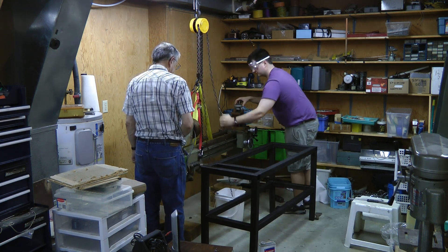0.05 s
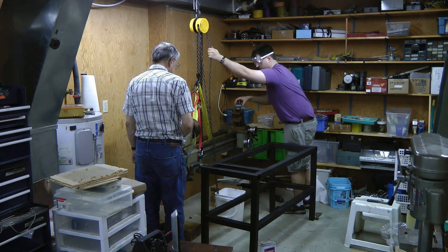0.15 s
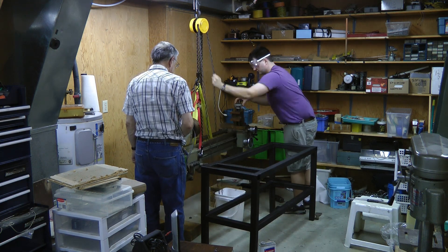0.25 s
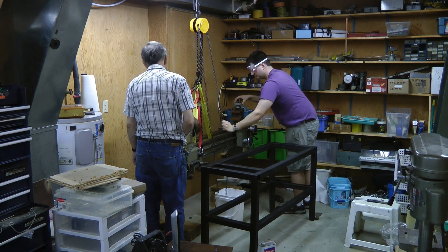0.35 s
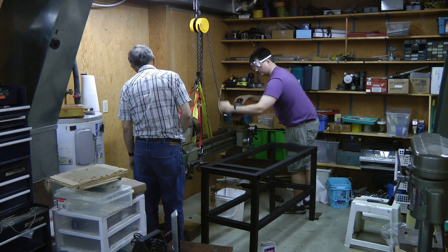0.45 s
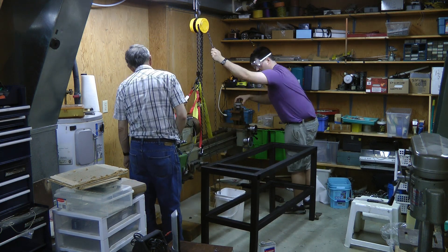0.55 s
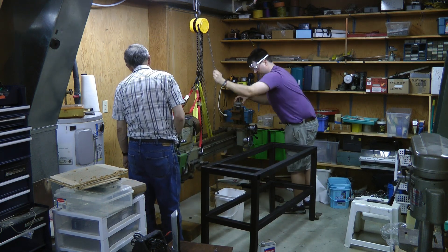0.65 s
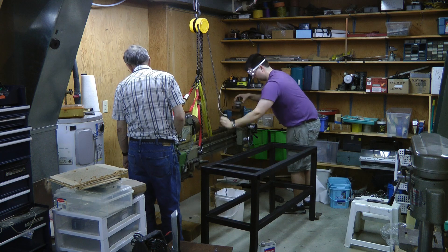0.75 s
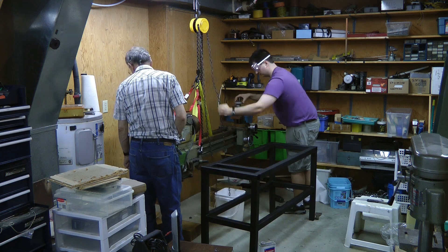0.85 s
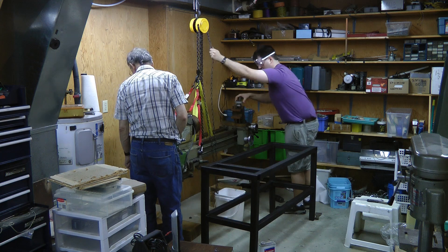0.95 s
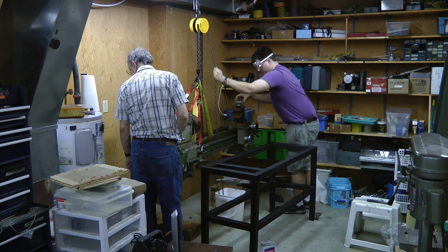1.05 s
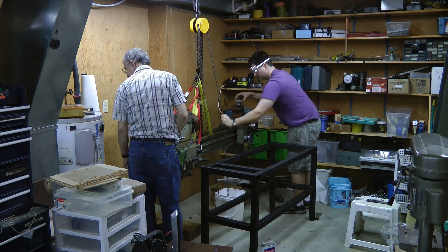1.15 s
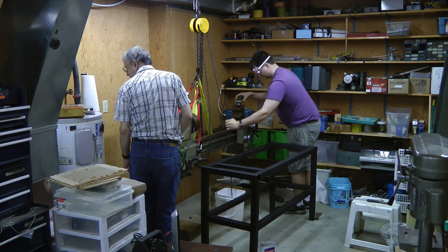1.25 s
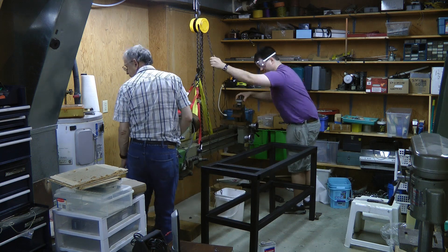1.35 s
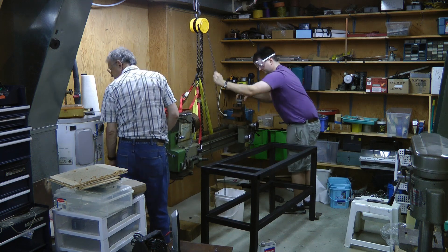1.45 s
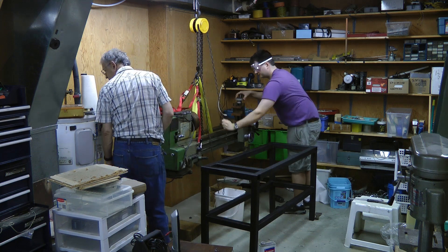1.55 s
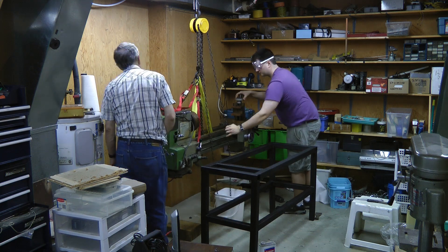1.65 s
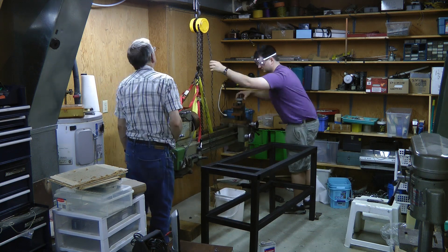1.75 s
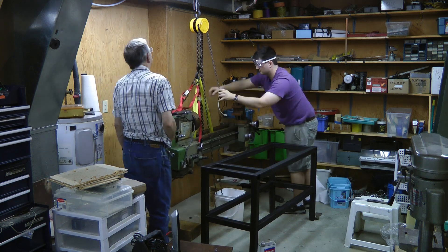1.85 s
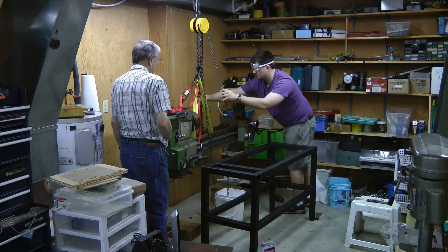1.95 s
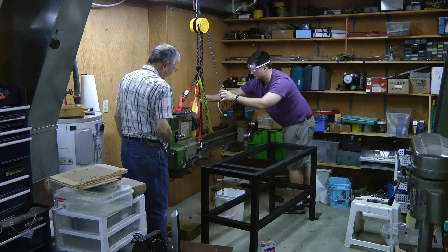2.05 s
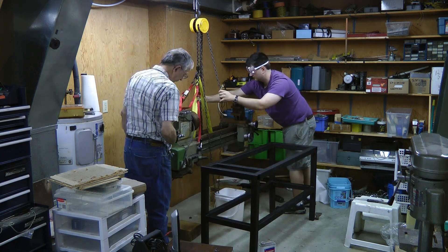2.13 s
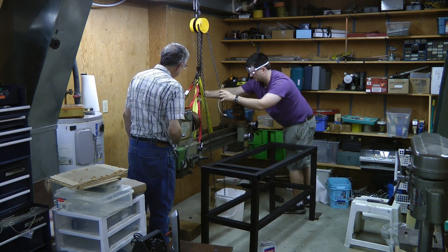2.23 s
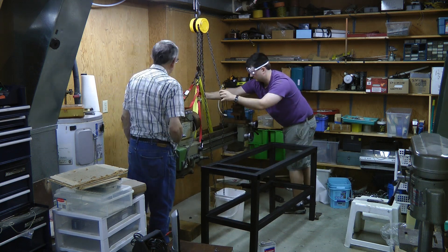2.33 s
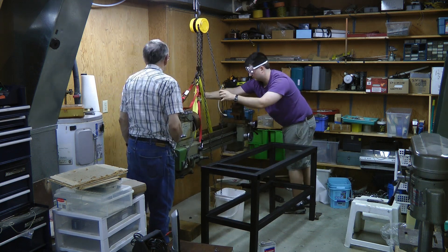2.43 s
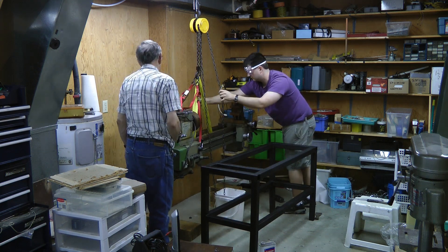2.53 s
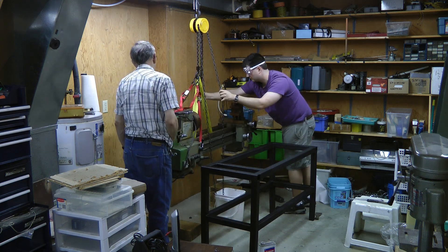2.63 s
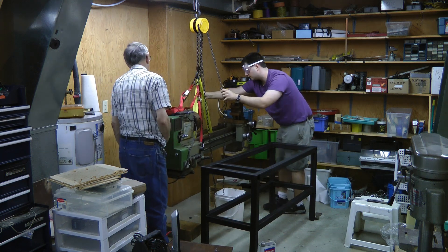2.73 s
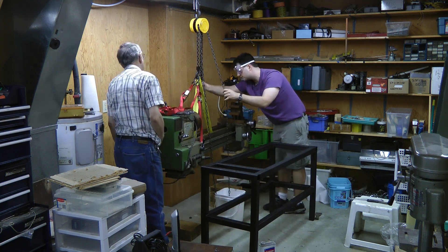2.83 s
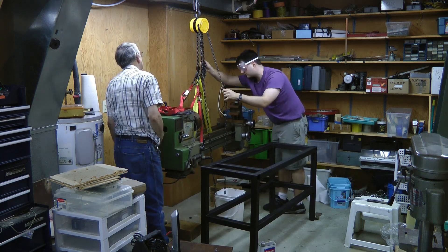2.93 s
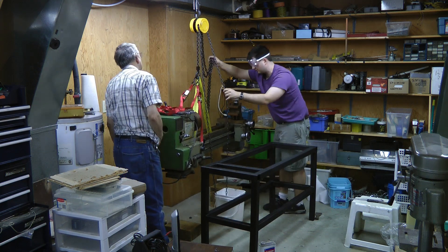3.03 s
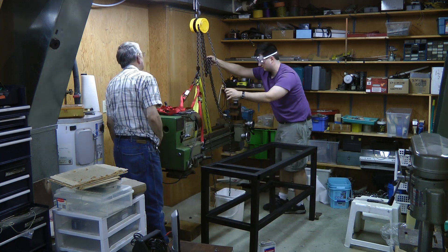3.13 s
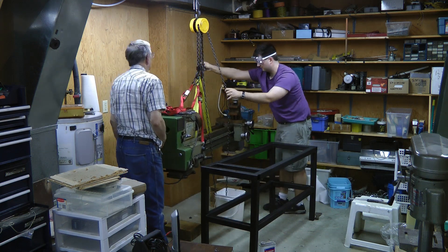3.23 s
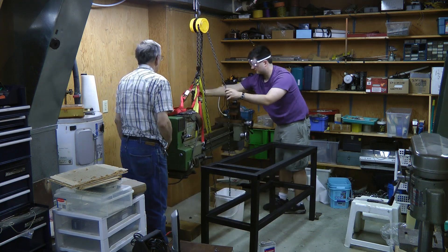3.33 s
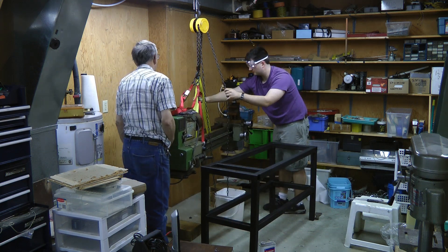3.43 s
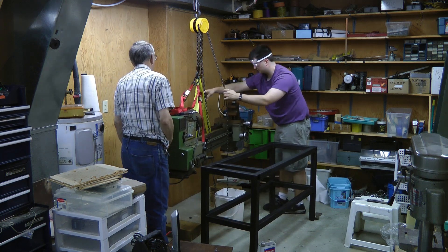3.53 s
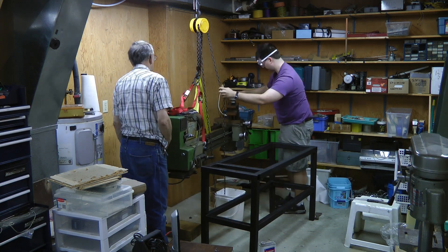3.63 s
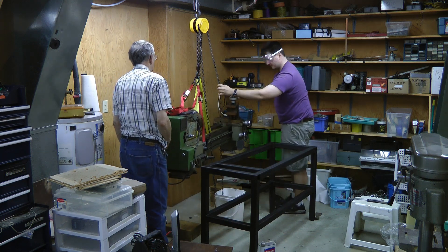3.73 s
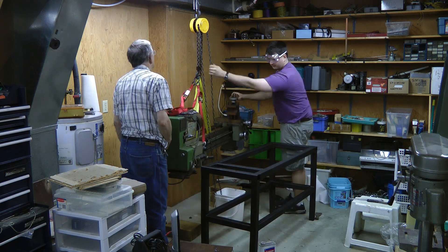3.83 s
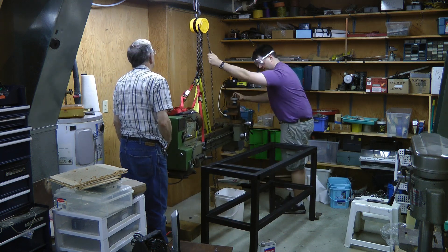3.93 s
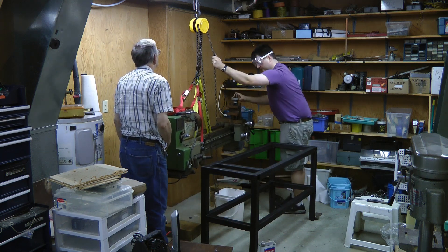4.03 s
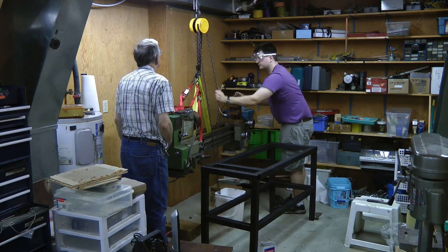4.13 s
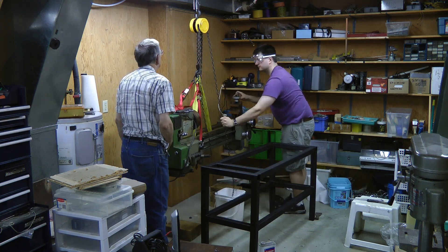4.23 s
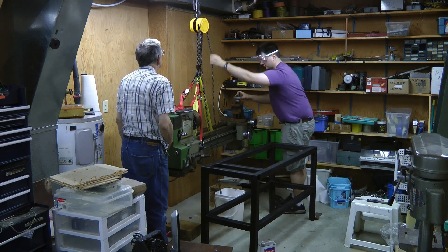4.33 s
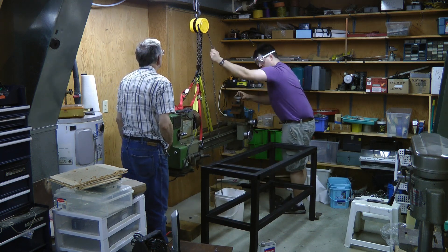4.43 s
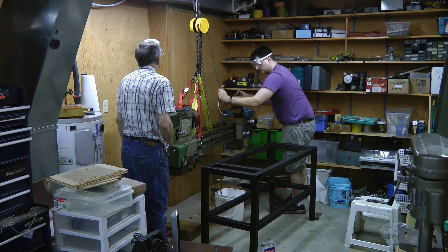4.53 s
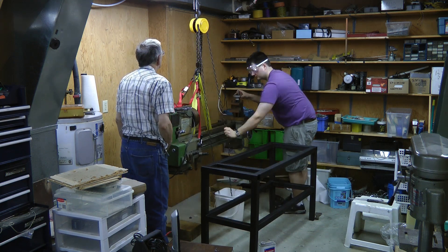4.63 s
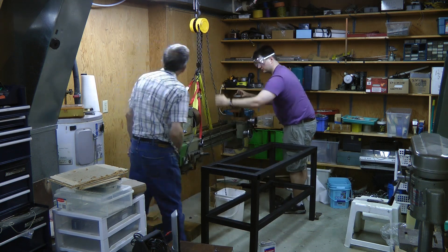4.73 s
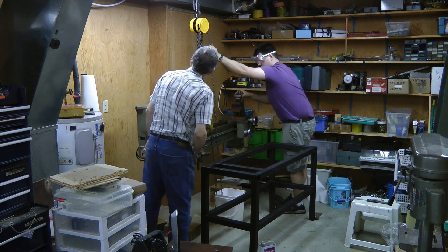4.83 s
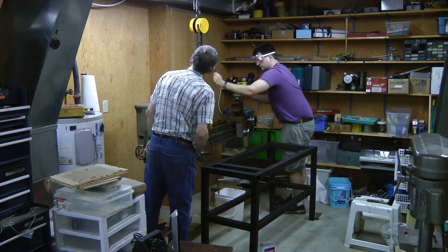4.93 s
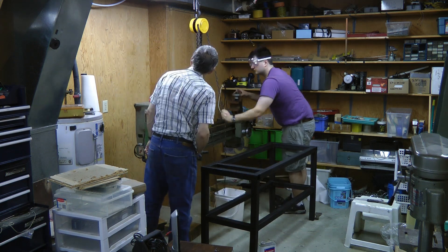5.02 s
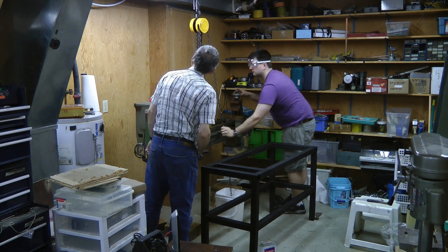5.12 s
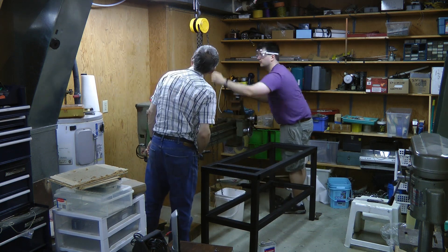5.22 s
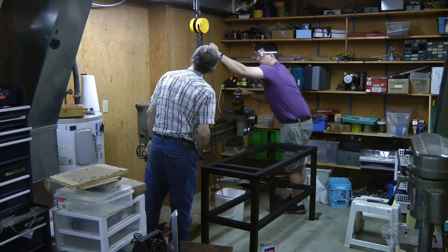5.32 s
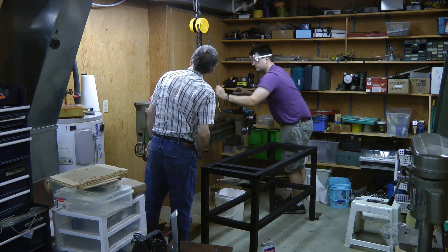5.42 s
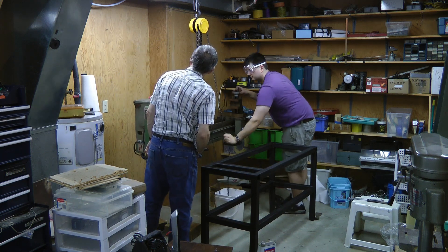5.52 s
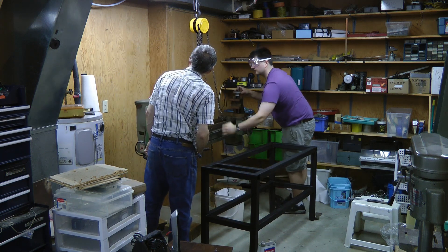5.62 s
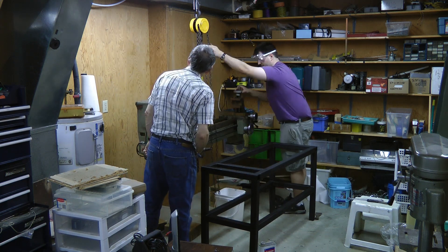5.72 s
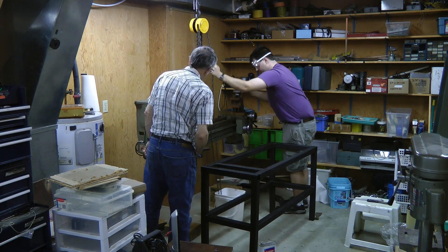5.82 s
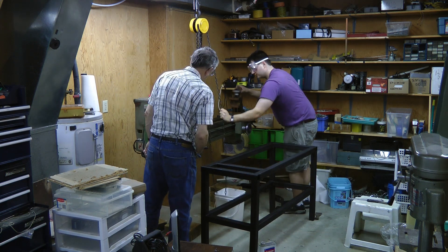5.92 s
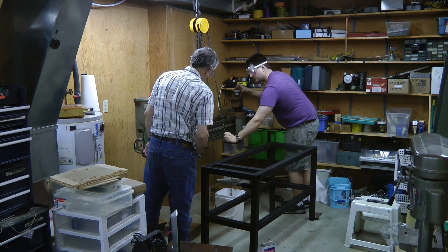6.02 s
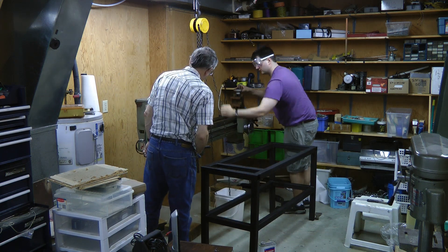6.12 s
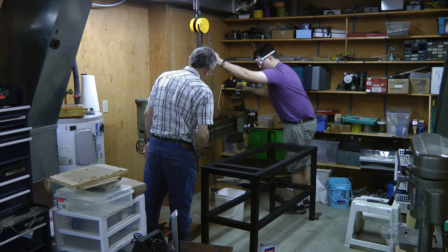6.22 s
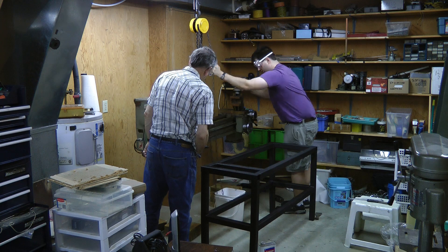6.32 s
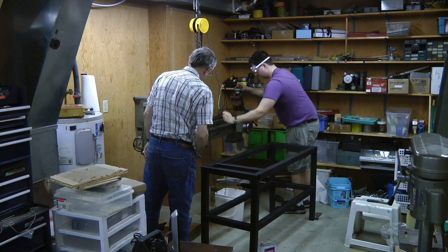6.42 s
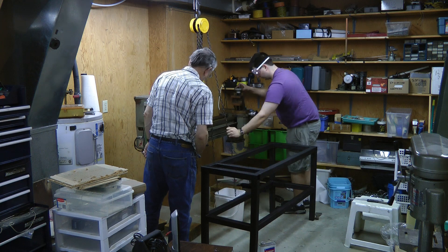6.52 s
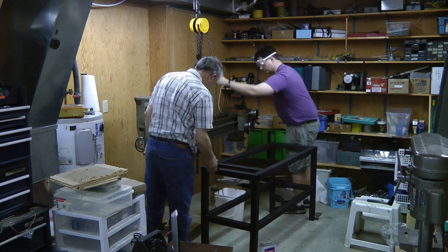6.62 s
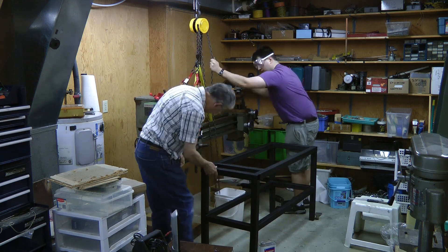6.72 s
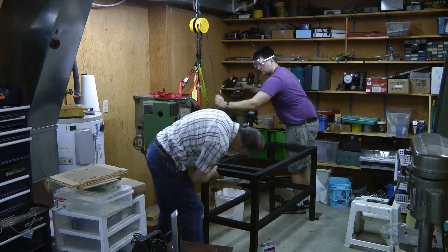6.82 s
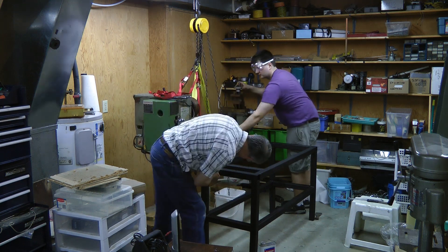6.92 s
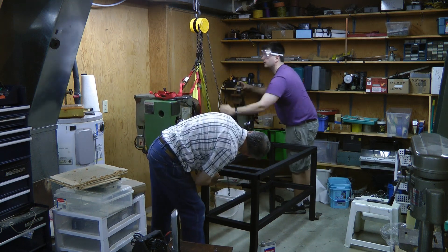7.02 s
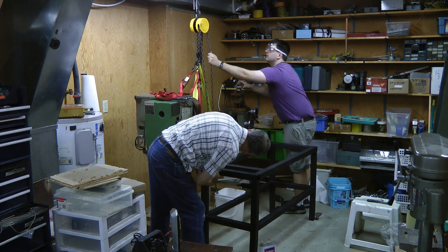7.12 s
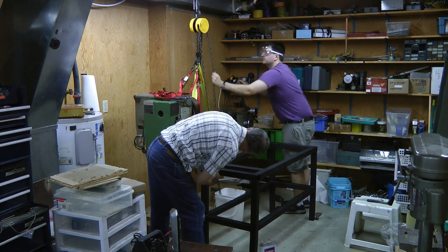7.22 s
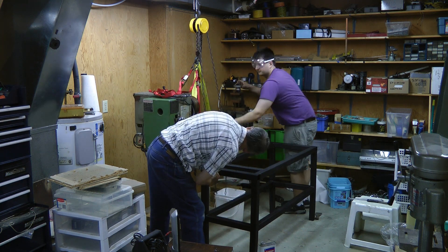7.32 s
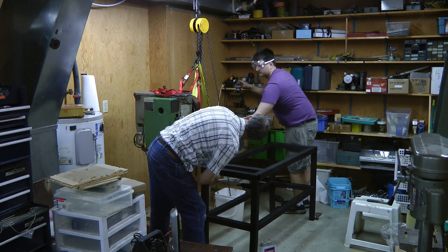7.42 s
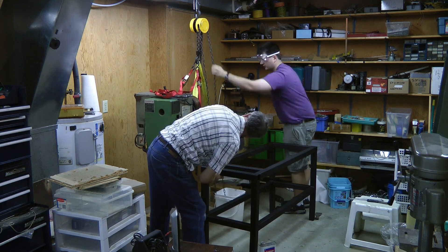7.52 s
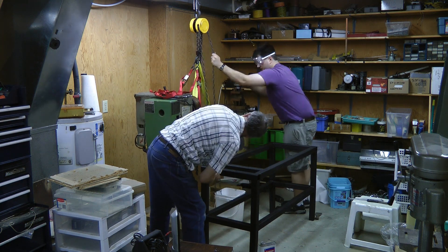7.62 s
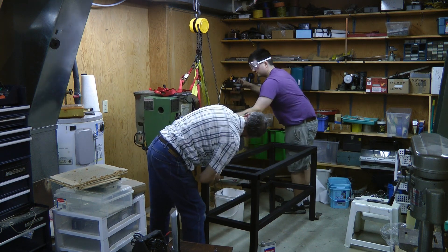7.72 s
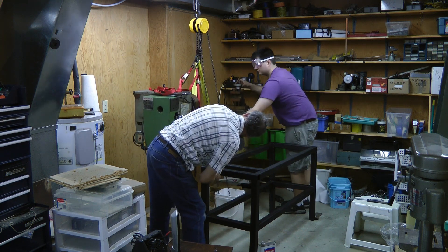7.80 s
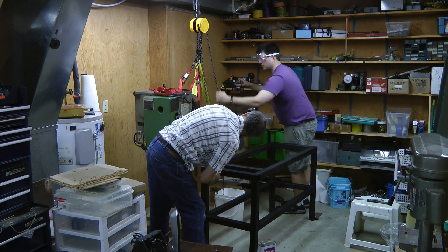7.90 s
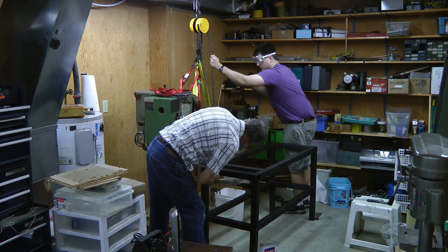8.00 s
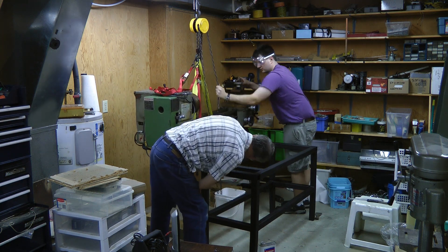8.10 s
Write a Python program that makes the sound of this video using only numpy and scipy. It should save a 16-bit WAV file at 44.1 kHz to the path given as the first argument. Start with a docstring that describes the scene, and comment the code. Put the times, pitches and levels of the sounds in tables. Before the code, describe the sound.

A hand chain hoist is hauled in short bursts, its ratchet clicking rapidly and chain rattling, with slack jingles and dull knocks between pulls.

```python
"""Hand chain hoist in a workshop

A hand chain hoist lifts a heavy machine in a small, cluttered workshop, a few metres away.
On each pull the pawl snaps over the ratchet teeth and random link contacts rattle round the chain wheel.
Between pulls the slack chain jingles, clinks and knocks; in a pause the load is steadied and the chain scrapes.
Each force rings filtered bodies through scattered room paths, over soft air noise and a faint hum."""
import sys
import numpy as np
from scipy import signal
from scipy.fft import rfft, irfft
from scipy.io import wavfile
from scipy.ndimage import uniform_filter1d

SR = 44100
rng = np.random.default_rng(int(sys.argv[2]) if len(sys.argv) > 2 else 0)


def unload_audio(sound):
    """Save the sound as a 16-bit wav file, at the path given as the first command line argument."""
    columns = np.transpose(np.atleast_2d(sound))
    # keep every value between -1 and 1, then stretch to whole-number steps
    steps = np.round(np.clip(columns, -1, 1) * 32767)
    wavfile.write(sys.argv[1], SR, steps.astype(np.int16))


N = 359856
TAPS = 8192  # length of every impulse response [samples]
HZ = np.fft.rfftfreq(TAPS, 1 / SR)
TIME = np.arange(N) / SR

# pulls on the hand chain, levels relative, release before each part's share of it:
# (start [s], length [s], time to take up the slack [s], release [dB/s], chain rattle [dB], pawl [dB],
#  low rumble [dB], top speed [teeth/s], swell over the pull [dB])
PULL_TABLE = [(0.225, 0.16, 0.011, 700, -31.5, -33, -44, 93, -3),
              (0.624, .160, .002, 850, -31.5, -32.5, -45, 101.5, 0.5),
              (1.024, .170, 0.011, 680, -32.5, -33, -46.5, 95, -1),
              (1.424, 0.16, 0.026, 554, -31, -33.5, -50, 98.5, 1.5),
              (4.040, 0.17, 0.04, 700, -32, -33, -46.5, 86, 0),
              (4.436, 0.21, .018, 620, -31.5, -34.5, -44, 87, -1),
              (4.871, 0.21, 0.019, 540, -32, -33.5, -45.5, 84, 0.6),
              (5.326, 0.19, 0.026, 578, -30.5, -32.5, -48, 90, -2),
              (5.777, 0.22, 0.017, 600, -32.5, -33, -47, 66, -4),
              (6.295, .172, 0.0021, 850, -32, -32.5, -45.5, 74.6, -2.5),
              (6.740, .175, 0.0016, 800, -31.5, -34, -44, 82, -2),
              (7.164, .181, 0.0087, 720, -32, -34, -46.5, 78, 0),
              (7.624, 0.1, 0.0078, 513, -30, -33.5, -48, 103, -1.5),
              (8.026, .170, 0.0031, 700, -31.5, -33, -45.5, 85, 0.5)]


def amp(db):
    """Decibels to gain."""
    return 10 ** (np.asarray(db) / 20)


def read(points, hz=HZ):
    """A table joined by straight lines on a log-frequency axis."""
    f, value = np.transpose(points)
    return np.interp(np.log(hz + 1), np.log(f + 1), value)


def resonances(modes):
    """Summed power response of modes, each a resonant peak of given pitch, width and level."""
    return sum(amp(db) ** 2 / (1 + (2 * (HZ - hz) / width) ** 2) for hz, width, db in modes)


def hoist(force):
    """Gain of the hoist's wheels and housing when struck with the given force spectrum."""
    # modes of the wheels and housing: (frequency [Hz], width [Hz], relative level [dB])
    hoist_modes = [(903, 53, -3.5), (933, 10, 3), (953, 22, 2), (963, 110, -7), (1270, 9.4, -4.5),
                   (1578, 68, -4), (1723, 31, -3), (1815, 34.6, -2.5), (2644, 250, -10), (2634, 9.6, -6),
                   (3343, 18, -6), (3666, 24, -13.5), (3870, 19.5, -9), (3950, 25, -10), (3970, 26, -5.5),
                   (4330, 20, -7), (4240, 82, -7.5), (4970, 16, -19.5), (5257, 63, -7), (5800, 130, -12),
                   (6100, 22.8, -6.5), (6620, 71, -8), (6900, 21, -17), (7220, 52, -9.5), (7350, 25, -18),
                   (8940, 51, -10), (9500, 52, -15), (11300, 33, -18), (12020, 50, -25.5),
                   (13750, 120, -24.5)]
    # dense, quickly damped modes on the same scale: (frequency [Hz], relative level [dB])
    dense_modes = [(100, -57), (300, -30), (700, -16), (1300, -14), (2100, -22), (3200, -19), (6000, -16.5),
                   (8000, -18), (10000, -19.5), (11800, -27), (13700, -24.5), (15500, -36.5)]
    body = resonances(hoist_modes) + amp(read(dense_modes)) ** 2
    return amp(read(force)) * np.sqrt(body)


def causal(gain):
    """Minimum-phase impulse response of unit energy: the given gain, and no sound before the blow."""
    log_gain = np.log(np.maximum(gain / gain.max(), 1e-5))
    full = np.concatenate([log_gain, log_gain[-2:0:-1]])
    response = np.fft.ifft(np.exp(np.conj(signal.hilbert(full)))).real
    return response / np.linalg.norm(response)


def workshop(direct=0.37, early_s=.011, late_db=-17, build_s=0.0033, even_hz=110):
    """One stereo path: direct sound, dense scatter from nearby shelves, a faint short tail."""
    # decay of the tail by 60 dB: (frequency [Hz], time [s])
    tail_decay = [(150, 0.34), (500, 0.032), (2000, 0.23), (8000, 0.036), (16000, 0.14)]
    t = np.arange(TAPS) / SR
    early, late = rng.standard_normal((2, 2, TAPS))
    early *= np.exp(-t / early_s) * (1 - np.exp(-t / build_s))
    hz, at, bands = signal.stft(late, SR, nperseg=256)
    bands = bands * amp(-60 * at / read(tail_decay, hz)[:, None])
    late = signal.istft(bands, SR, nperseg=256)[1][:, :TAPS]
    path = early / np.linalg.norm(early[0]) + amp(late_db) * late / np.linalg.norm(late[0])
    path[:, 0] += direct
    # flatten the broad colour: only the fine ripple differs from path to path
    power = uniform_filter1d((abs(rfft(path)) ** 2).mean(0), int(even_hz / HZ[1]) + 1)
    return signal.fftconvolve(path, causal(1 / np.sqrt(power))[None], axes=1)[:, :TAPS]


def sound(force, gain, count=4, early_s=0.0048, dwell_s=.012):
    """A force rings a body; the contact hops between a few spots, each with its own path through the room."""
    spot = rng.integers(0, count, N)[(TIME / dwell_s).astype(int)]
    body, out = causal(gain), np.zeros((2, N))
    for k in range(count):
        path = signal.fftconvolve(workshop(early_s=early_s), body[None], axes=1)[:, :TAPS]
        path /= np.linalg.norm(path, axis=1, keepdims=True)
        out += signal.oaconvolve((force * (spot == k))[None], path, axes=1)[:, :N]
    return out


def collisions(per_s, spread_db, even_s=0.074):
    """Random contacts of uneven size and sign, evened over a short window to about unit power."""
    happens = rng.random(N) < per_s / SR
    size = amp(spread_db * rng.standard_normal(N)) * rng.choice([-1, 1], N) * happens
    return size / np.sqrt(abs(uniform_filter1d(size ** 2, int(even_s * SR))) + 1e-6)


def blows(times, dbs, chatter_s, lead_s=0.0006, count=40):
    """Each blow is a tight cluster of contacts: the parts graze, strike, then chatter to rest."""
    train, spread = np.zeros(N), np.linspace(-3, 3, count)
    for s, db in zip(times, dbs):
        phase = spread + rng.uniform(-3, 3, count) / count
        size = np.exp(-abs(phase)) * rng.standard_normal(count)
        at = (s + phase * np.where(phase < 0, lead_s, chatter_s)) * SR
        np.add.at(train, np.clip(at.astype(int), 0, N - 1), amp(db) * size / np.linalg.norm(size))
    return train


def rings(rows, ring_db, width_hz, early_s):
    """Each row (time, level, pitch) is one blow on a single resonance, heard through its own room path."""
    out = np.zeros((2, N))
    for s, db, hz in rows:
        body = causal(resonances([(hz, width_hz, 0)]))
        ring = signal.fftconvolve(workshop(early_s=early_s), body[None], axes=1)
        ring /= np.linalg.norm(ring, axis=1, keepdims=True)
        part = out[:, round(s * SR):][:, :TAPS]
        part += amp(db + ring_db) * ring[:, :part.shape[1]]
    return out


def pull_level(part, shape):
    """Gain of one hoist part: each pull takes up the slack, runs, then drops away at its release rate."""
    attack_db_per_s, take_up_db, rise_db, release_share, lag_s = shape
    grip_s = .008  # the chain comes taut within this time
    gain = np.zeros(N)
    for start, length, take_up_s, release_db_per_s, rattle_db, pawl_db, rumble_db, _, swell_db in PULL_TABLE:
        t = TIME - start - lag_s
        hold = dict(rattle=rattle_db, pawl=pawl_db, rumble=rumble_db)[part]
        hold = hold + (rise_db + swell_db) * (np.clip(t / length, 0, 1) - .5)
        slack = np.clip((take_up_s - t) / grip_s + .5, 0, 1)
        attack = attack_db_per_s * np.minimum(t, 0) - take_up_db * slack
        release = release_share * release_db_per_s * np.maximum(t - length, 0)
        gain += amp(np.maximum(hold + attack - release, -200))
    return gain


def swing_level(part, toss_db=9, settle_s=0.06, rise_s=0.0073, fade_s=.025):
    """Gain of the slack chain: tossed, it settles towards a steady level and fades at the end of its length."""
    # swings, relative levels they settle towards: (start [s], length [s], jingle [dB], low rumble [dB])
    swing_table = [(0.0, .2, -46, -49.5), (0.418, 0.22, -62.5, -66.5), (0.847, 0.26, -55.5, -56.5),
                   (1.216, 0.22, -52, -57), (1.612, 0.22, -60.5, -62.5), (4.238, 0.19, -52, -52),
                   (4.70, 0.1535, -58.5, -59), (5.14, 0.15, -58, -58), (5.541, 0.2, -51, -55),
                   (6.011, 0.13, -59.5, -58), (6.19, 0.087, -60, -64), (6.507, 0.12, -69, -80),
                   (6.655, 0.088, -63, -70), (6.929, .22, -60, -66), (7.374, 0.08, -57, -56.5),
                   (7.475, 0.12, -56.5, -59), (7.775, 0.12, -55.5, -57.5)]
    gain = np.zeros(N)
    for start, length, jingle_db, rumble_db in swing_table:
        t = np.maximum(TIME - start, 0)
        db = dict(jingle=jingle_db, rumble=rumble_db)[part] + toss_db * np.exp(-t / settle_s)
        fade = np.clip(np.minimum(t / rise_s, (length - t) / fade_s + .5), 0, 1)
        gain += fade * amp(db)
    return gain


def room_tone(air_db=-66, shared=0.36):
    """Steady coloured noise, partly common to both channels, with faint sine hum."""
    # colour of the air noise: (frequency [Hz], relative density [dB])
    air_colour = [(20, -25.5), (50, -16), (120, -11), (210, -6), (300, -9), (500, -10.5), (950, -17.5),
                  (1400, -19.5), (1900, -22), (4000, -28.5), (6000, -32.5), (8000, -41), (11500, -44.5),
                  (13000, -62), (16000, -68)]
    # steady hum lines: (frequency [Hz], RMS level [dB])
    hum_lines = [(237, -83.5), (500, -81), (1000, -81.5), (1200, -85.5), (1793, -84.5)]
    left, right, both = rng.standard_normal((3, N))
    noise = np.array([left, right]) + shared * both
    air = irfft(rfft(noise) * amp(read(air_colour, np.fft.rfftfreq(N, 1 / SR))), N)
    hum = np.zeros((2, N))
    for hz, db in hum_lines:
        cycles = hz * TIME + rng.random((2, 1)) / 3  # each channel has its own phase
        hum += np.sqrt(2) * amp(db) * np.sin(2 * np.pi * cycles)
    return amp(air_db) * air / air.std() + hum


def scrapes(scrape_db=1, groan_db=2):
    """Short runs of random slips hiss in the links and make the loaded rig groan; a light rub joins them."""
    # the chain slipping as the load is steadied: (start [s], length [s], relative hiss [dB], groan [dB])
    slip_table = [(2.032, 0.029, -55, -55.5), (2.157, 0.021, -57, -58), (2.187, 0.047, -54, -50.5),
                  (2.28, 0.029, -54, -53.5), (2.315, 0.019, -47.5, -51.5), (2.388, 0.027, -57, -55),
                  (2.429, 0.056, -53, -53), (2.495, 0.042, -51, -49.5), (2.572, 0.062, -52, -58),
                  (2.789, 0.046, -54.5, -57), (2.812, 0.11, -65, -73)]
    # light rubbing between the slips: (time [s], relative level [dB])
    rub_level = [(1.9, -73), (2.1, -66.5), (2.55, -81), (2.68, -62.5), (2.78, -76), (2.86, -60.5),
                 (2.94, -67), (3.03, -68.5), (3.06, -92)]
    # colour of the hiss: (frequency [Hz], relative level [dB])
    hiss_colour = [(100, -13), (700, 1), (1000, -1), (1800, -12), (3300, -0.5), (4800, -2), (6500, -3.5),
                   (9000, -9.5), (12000, -19.5), (15500, -19)]
    # modes of the rubbing links: (frequency [Hz], width [Hz], relative level [dB])
    rubbing_modes = [(1400, 230, -1), (1780, 200, 2.5), (2300, 130, 7), (4500, 300, -3)]
    # modes of the loaded rig: (frequency [Hz], width [Hz], relative level [dB])
    rig_modes = [(453, 74, -2), (500, 89, -3), (597, 84, -2.5)]
    hiss = amp(np.interp(TIME, *np.transpose(rub_level), left=-np.inf, right=-np.inf))
    groan = np.zeros(N)
    for s, length, hiss_db, low_db in slip_table:
        arch = abs(np.sin(np.pi * np.clip((TIME - s) / length, 0, 1))) ** 0.65
        hiss = hiss + amp(hiss_db + scrape_db) * arch
        groan = groan + amp(low_db + groan_db) * arch
    slips = collisions(per_s=1300, spread_db=3, even_s=.015)
    link_gain = np.sqrt(amp(read(hiss_colour)) ** 2 + resonances(rubbing_modes))
    scrape = sound(slips * hiss, link_gain, early_s=0.0057)
    return scrape + sound(slips * groan, resonances(rig_modes), early_s=0.0057)


def free_pings():
    """A link left free to ring sounds one damped high resonance."""
    # pings: (time [s], relative level [dB], pitch [Hz])
    ping_table = [(3.02, -47, 4000), (4.235, -31.5, 4240), (4.862, -43, 4340), (5.3, -40, 4330)]
    return rings(ping_table, ring_db=18, width_hz=260, early_s=.004)


def load_knocks():
    """The chain knocks dully against the hanging load: one low, damped resonance a blow."""
    # knocks: (time [s], relative level [dB], pitch [Hz])
    knock_table = [(0.094, -33, 334), (0.164, -36.5, 315), (0.486, -37.5, 344), (0.788, -30, 380),
                   (0.935, -37, 328), (1.303, -39.5, 300), (1.366, -42.5, 420), (1.508, -32, 312),
                   (1.743, -44.5, 200), (3.796, -44.5, 301), (4.334, -30.5, 294), (4.504, -32, 310),
                   (4.635, -35, 286), (4.777, -42.5, 402), (4.947, -33, 335), (5.126, -31.5, 210.2),
                   (5.1, -35.5, 263), (5.562, -38, 297.7), (5.676, -37.5, 305), (6.128, -46.5, 289),
                   (6.567, -46.5, 303), (6.662, -39.5, 296), (6.944, -39.5, 190), (6.982, -34.5, 430),
                   (7.096, -34, 342.3), (7.552, -35.5, 346.2), (7.8, -47, 232.5), (7.956, -43, 363),
                   (8.103, -33, 364.6)]
    return rings(knock_table, ring_db=22.0, width_hz=107, early_s=0.0046)


def rumble(slack_db=-2):
    """The jerking chain shakes the hoist body and the hanging load: very uneven contacts, coloured low."""
    # how the rumble follows a pull: (attack [dB/s], loss while slack is taken up [dB],
    # rise over the pull [dB], share of the release rate [ratio], lag [s])
    rumble_shape = (1800, 3.1, 0.5, 0.69, 0.013)
    # colour of the rumble: (frequency [Hz], relative level [dB])
    rumble_colour = [(20, -29.5), (60, -28), (95, -13), (140, -14.5), (210, -3.5), (320, 0.5), (450, -6.5),
                     (700, -9), (1100, -19), (4000, -77)]
    level = pull_level("rumble", rumble_shape) + amp(slack_db) * swing_level("rumble")
    force = level * collisions(per_s=500, spread_db=8.5, even_s=0.032)
    return sound(force, amp(read(rumble_colour)), count=5, early_s=0.0074)


def slack_chain(jingle_db=-3, clink_db=17, bright_db=-5):
    """The loose loop jingles with random contacts as it swings; clusters of contacts make louder clinks."""
    # links striking each other: (time [s], relative level [dB], treble relative to it before trim [dB])
    clink_table = [(0.004, -22, 4), (0.037, -34, 4), (0.058, -27.5, -20), (0.075, -22, -14),
                   (0.122, -29, -23), (0.482, -31, -23), (0.508, -36.5, -22), (0.547, -42, -22),
                   (0.589, -39, -22), (0.901, -35.5, -26), (0.93, -32.5, -23), (0.972, -42, -22),
                   (1.23, -30.5, -24), (1.251, -32.5, -25), (1.297, -29.5, -24), (1.368, -34, -14),
                   (1.636, -31, -10), (1.744, -32, -29), (1.829, -54, -21), (1.895, -55, -16),
                   (1.941, -47.5, -25), (1.98, -44.5, -7), (2.138, -51, -2), (2.744, -46.5, -23),
                   (3.419, -44.5, -4), (3.43, -49, -12), (3.462, -46.5, 4), (3.509, -58.5, 10),
                   (3.604, -47, -15), (3.641, -44.5, -1.5), (3.717, -55, -21), (3.801, -43.5, -24),
                   (3.826, -49, -17), (3.899, -52, -26), (4.001, -48.5, -8), (4.296, -39, -13),
                   (4.336, -31, -20), (4.366, -40, -2), (4.392, -36, -18), (4.763, -34, -21),
                   (4.78, -34, -23), (4.869, -39, -10), (5.17, -35, -19), (5.198, -40.5, -20),
                   (5.234, -41.5, -26), (5.283, -43, -22), (5.565, -28.5, -3), (5.675, -35.5, -11),
                   (6.028, -31.5, -22), (6.061, -34.5, -24), (6.08, -35, -22), (6.119, -35.5, -16),
                   (6.21, -40, -24), (6.52, -45.5, -28), (6.57, -44, -25), (6.634, -45.5, -1),
                   (6.655, -31.5, -16), (6.699, -54, -20), (6.714, -49, -20), (6.975, -37, -22),
                   (7.036, -41.5, -26), (7.138, -43, -20), (7.383, -27, -22), (7.398, -35.5, -22),
                   (7.482, -36.5, -24), (7.523, -38.5, -19), (7.55, -32, -20), (7.801, -38.5, -19),
                   (7.847, -36.5, -26), (7.925, -45.5, -20), (7.95, -37.5, -25), (7.982, -44.5, -33)]
    # colour of the links: (frequency [Hz], relative level [dB])
    link_colour = [(100, -11.5), (500, -0.5), (950, 4.5), (1400, 0), (2000, -1.5), (2700, -0.5), (3500, -4),
                   (4300, -5), (5500, -7.5), (8000, -17), (11000, -26.5), (15500, -30.5)]
    s, db, treble = np.transpose(clink_table)
    contacts = collisions(per_s=460, spread_db=0, even_s=0.04)
    jingle = amp(jingle_db) * swing_level("jingle") * contacts
    clinks = blows(s, db + clink_db, chatter_s=.005, lead_s=0.0018)
    edges = blows(s, db + treble + clink_db + bright_db, chatter_s=0.004, lead_s=0.0013)
    bright = amp(read([(1000, -27.5), (5000, 6.0), (8000, 3.5), (11000, -8), (15000, -16)]))
    full = sound(jingle + clinks, amp(read(link_colour)), early_s=0.0067)
    return full + sound(edges, bright, count=2)


def clacks(clack_db=16, ring_db=10, ring_hz=3359):
    """The pawl takes up or catches the load with one hard blow, and its own mode rings."""
    # hard drops of the pawl as a pull starts or ends:
    # (time [s], relative level [dB], relative level of the pawl's ring [dB])
    clack_table = [(0.225, -25, -44), (0.621, -20.5, -39), (0.833, -18, -11.5), (1.028, -19.5, -44),
                   (1.426, -24, -54.5), (1.447, -21.5, -39), (4.04, -20.5, -53), (4.072, -19, -43),
                   (4.437, -32.5, -51), (4.685, -22.5, -51), (4.892, -24, -43), (5.126, -17.5, -25),
                   (5.326, -20, -43), (5.775, -24.5, -48), (6.295, -20.5, -25), (6.741, -20, -42),
                   (6.906, -19.5, -43), (6.94, -23.5, -51), (7.093, -27, -35), (7.169, -22.5, -43),
                   (7.632, -20.5, -35), (8.027, -25, -42)]
    s, db, ring = np.transpose(clack_table)
    strikes = blows(s + .001, db + clack_db, chatter_s=.003, lead_s=.003)
    clack_force = [(100, -3.5), (1500, -2.0), (4000, -0.5), (15000, -14)]  # (Hz, dB)
    body = sound(strikes, hoist(clack_force), early_s=0.0036)
    tones = [(at + 0.0015, tone_db, ring_hz) for at, tone_db in zip(s, ring)]
    return body + rings(tones, ring_db, width_hz=100, early_s=0.001)


def teeth(slowest=.72, jitter_s=.0006, coast_s=.025):
    """Moments when the pawl drops, and the tooth rate then: the arm speeds up and slows in each pull."""
    times, rates = [], []
    for start, length, *_, top, _ in PULL_TABLE:
        t = np.arange(start, start + length + coast_s, 1 / SR)
        speed = top * (slowest + (1 - slowest) * np.sin(np.linspace(0, np.pi, len(t))))
        teeth_passed = np.floor(np.cumsum(speed) / SR)
        drop = np.flatnonzero(np.diff(teeth_passed))
        times.extend(t[drop])
        rates.extend(speed[drop])
    times = np.array(times) + jitter_s * rng.standard_normal(len(times))
    inside = times < TIME[-1]
    return times[inside], np.array(rates)[inside]


def running_chain(times, ring_db=-13):
    """Links crowd through the guide and round the wheel; every tooth shakes them, and scattered ones ring."""
    # how the rattle follows a pull: (attack [dB/s], loss while slack is taken up [dB],
    # rise over the pull [dB], share of the release rate [ratio], lag [s])
    rattle_shape = (3797.5, 9, -1, 1, -0.0046)
    # force spectrum of the chain: (frequency [Hz], relative level [dB])
    chain_force = [(100, -7.5), (900, -16), (1900, -2), (3000, -0.5), (7000, 1.5), (16000, 1.5)]
    # modes of a single link: (frequency [Hz], width [Hz], relative level [dB])
    link_modes = [(4214, 150, 3.5), (4480, 90, 0.5), (5870, 80, -18.5)]
    shake, shake_s = .7, .004  # depth and decay of the shaking by each tooth
    jolts = np.bincount(np.clip((times * SR).astype(int), 0, N - 1), minlength=N)
    jolts = signal.lfilter([1], [1, -np.exp(-1 / (shake_s * SR))], jolts)
    force = collisions(per_s=2600, spread_db=2.5) * (1 + shake * jolts) / (1 + shake / 3)
    run = pull_level("rattle", rattle_shape)
    rattle = sound(force * run, hoist(chain_force), count=7, early_s=0.0047, dwell_s=.035)
    free_links = collisions(per_s=45, spread_db=2.5, even_s=0.1) * run
    return rattle + amp(ring_db) * sound(free_links, resonances(link_modes), count=3, early_s=.004)


def ratchet(times, rates, pawl_db=0.6, link_db=2.0):
    """The pawl snaps off each tooth and rings the hoist; links lie flat and upright by turns."""
    # how the pawl follows a pull: (attack [dB/s], loss while slack is taken up [dB],
    # rise over the pull [dB], share of the release rate [ratio], lag [s])
    pawl_shape = (3500, 10, 1.7, 1.77, 0.0015)
    # force spectrum of the pawl: (frequency [Hz], relative level [dB])
    pawl_force = [(100, -14.5), (900, 1.5), (1900, -1), (3500, 2.5), (7000, -9), (16000, -18.5)]
    # scaling by tooth rate keeps the power of the run independent of its speed
    size = np.interp(times, TIME, pull_level("pawl", pawl_shape)) * np.sqrt(SR / rates)
    by_turns = link_db * (-1) ** np.arange(len(times))  # every other snap tends to be harder
    size *= amp(pawl_db + by_turns + rng.standard_normal(len(times)))
    size *= rng.choice([-1, 1], len(times))
    snaps = np.bincount(np.clip((times * SR).astype(int), 0, N - 1), size, N)
    return sound(snaps, hoist(pawl_force), count=8, early_s=.005)


def scene(hoist_db=2):
    """All the sources together, the pawl and the running chain sharing the same tooth times."""
    times, rates = teeth()
    loose = scrapes() + free_pings() + load_knocks() + rumble() + slack_chain()
    work = clacks() + running_chain(times) + ratchet(times, rates)
    return room_tone() + amp(hoist_db) * (loose + work)


def record(dry, limit_db=-27, squeeze=0.057, edge_hz=15900):
    """Fast, gentle gain control eases the loudest rattle; then a steep low-pass limits the band."""
    power = signal.lfilter([1 / 200], [1, 1 / 200 - 1], (dry ** 2).mean(0))
    over_db = np.maximum(10 * np.log10(power + 1e-12) - limit_db, 0)
    levelled = dry * amp(-squeeze * uniform_filter1d(over_db, size=200))  # squeeze: dB cut per dB over
    low_pass = signal.firwin(511, edge_hz, window=("kaiser", 9), fs=SR)
    return signal.oaconvolve(levelled, low_pass[None], "same")


dry = scene()
out = record(dry)
unload_audio(out)
```